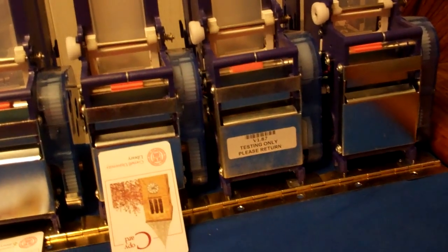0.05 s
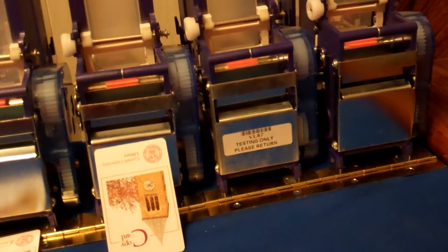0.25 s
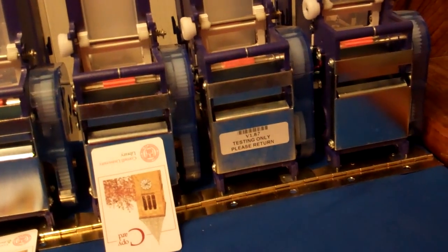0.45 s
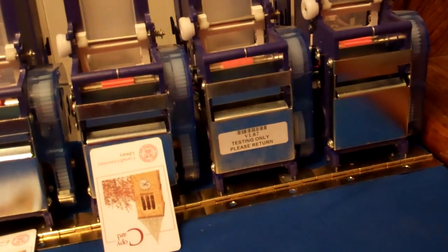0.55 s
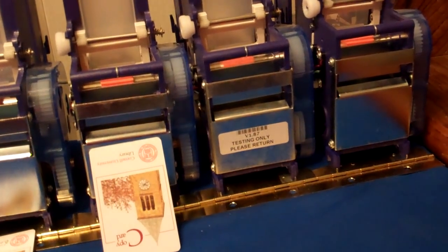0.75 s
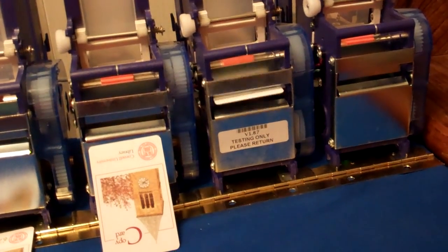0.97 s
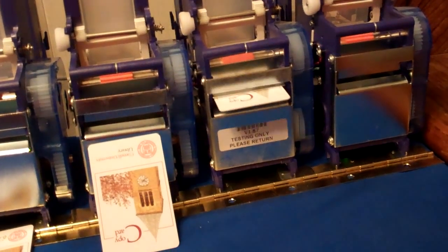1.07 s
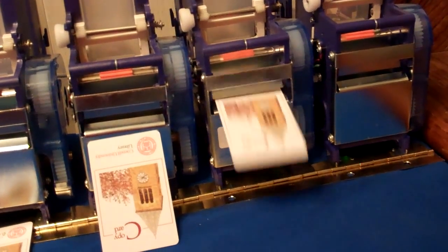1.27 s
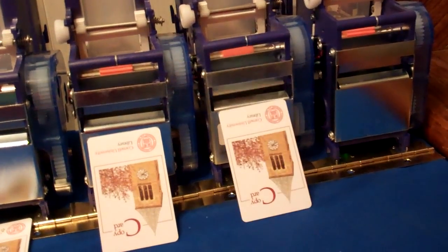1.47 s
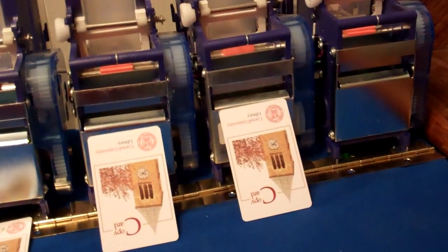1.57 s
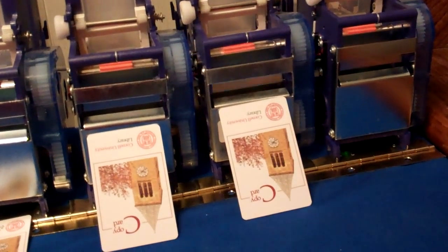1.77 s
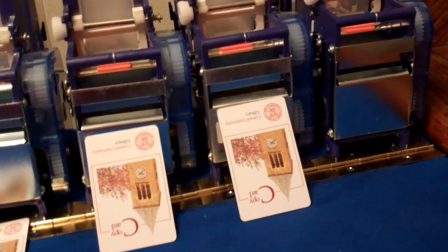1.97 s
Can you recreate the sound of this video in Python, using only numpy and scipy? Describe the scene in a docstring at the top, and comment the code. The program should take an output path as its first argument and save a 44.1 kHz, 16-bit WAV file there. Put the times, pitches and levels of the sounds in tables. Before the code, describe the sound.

Small motorised card dispenser whirs and rattles, pushes out a card with snaps, then stops abruptly

```python
"""A plastic rattle and a thin whine: a small motorised card dispenser on a table, close by in a quiet room.
The whine is four partials locked to the motor speed; gear teeth tick and scrape, ringing in the frame.
The motor slows and sings while rollers rasp along a card, drawn as coloured noise.
The card snaps free and taps the chute in short cracks of noise; the motor speeds up, then drops away.
One faint ring follows as the gears settle, over hiss and a faint mains hum."""
import sys
import numpy as np
from scipy.fft import rfft, irfft
from scipy.io import wavfile

SR = 44100
rng = np.random.default_rng(int(sys.argv[2]) if len(sys.argv) > 2 else 0)


def put_to_file(sound):
    """Save the sound as 16-bit audio at rate SR, in the file named by the first command-line argument."""
    columns = np.atleast_2d(sound).T  # one column per channel
    safe = np.clip(columns, -1, 1)
    whole_steps = np.round(safe * 32767)
    wavfile.write(sys.argv[1], SR, whole_steps.astype(np.int16))


N = 88993
TIME = np.arange(N) / SR  # s
FREQS = np.fft.rfftfreq(2 * N, 1 / SR)  # Hz, for a doubled length so that filter tails do not wrap round


def from_db(db):
    """Amplitude factor for a level in dB."""
    return 10 ** (np.asarray(db) / 20)


def rms_one(x):
    """The same shape scaled to an RMS of 1."""
    return x / np.sqrt(np.mean(x ** 2) + 1e-20)


def in_time(rows):
    """Each column of a time curve, interpolated at every sample."""
    seconds, *columns = np.transpose(rows)
    return [np.interp(TIME, seconds, column) for column in columns]


def colour(points):
    """Gain at every frequency from (frequency [Hz], level [dB]) points, joined along log frequency."""
    hz, db = np.transpose(points)
    return from_db(np.interp(np.log(FREQS + 1), np.log(hz), db))


def filtered(x, gain):
    """Sound shaped by a frequency response."""
    return irfft(rfft(x, 2 * N) * gain)[..., :N]


def drift(hz):
    """Random wavering slower than about hz, with an RMS of 1."""
    return rms_one(filtered(rng.standard_normal(N), 1 / (1 + (FREQS / hz) ** 4)))


def reflections(decay_s):
    """Frequency response of a dying cloud of random reflections, of unit energy."""
    cloud = rng.standard_normal(N) * np.exp(-np.minimum(TIME / decay_s, 50))
    return rfft(cloud / np.linalg.norm(cloud), 2 * N)


def spread(middle, other):
    """Stereo: the side is partly the middle with scattered phase, partly another sound of its kind."""
    # side against middle: (frequency [Hz], level [dB])
    side_width = [(100, -7), (400, -37.5), (750, -53), (1400, -21.5), (2700, -11.5), (5500, -4.5),
                  (10000, -1), (13500, 2.5)]
    scatter_s, likeness = 0.0061, 0.55  # decay of the scatter (s), share of the side drawn from the middle
    scatter = 1j * rms_one(np.imag(reflections(scatter_s)))
    scattered = filtered(middle, scatter)
    mixed = likeness * scattered + np.sqrt(1 - likeness ** 2) * other
    side = filtered(mixed, colour(side_width))
    return np.array([middle + side, middle - side])


def background():
    """The quiet room: coloured hiss in stereo, and the hum as steady sines alike on both sides."""
    # colour of the room noise: (frequency [Hz], relative level [dB])
    hiss_colour = [(25, -25), (55, -26), (95, -12), (240, -11.5), (400, -15.5), (750, -6), (1400, -14.5),
                   (2600, -14), (4500, -14.5), (7300, -14), (8000, -9), (8800, -13.5), (14000, -13.5)]
    # steady tones of the hum: (frequency [Hz], RMS level [dB])
    hum_tones = [(120, -72.5), (221, -82)]
    hiss_db = -57.5  # RMS before the stereo spread
    noise = filtered(rng.standard_normal((2, N)), colour(hiss_colour))
    hiss = from_db(hiss_db) * rms_one(noise)
    hum = sum(from_db(db) * rms_one(np.sin(2 * np.pi * hz * TIME)) for hz, db in hum_tones)
    return spread(*hiss) + hum


def room(x):
    """Short reverberation: decaying random reflections, drawn separately for each side."""
    t60_s, level_db = 0.27, -11
    decay_s = t60_s / np.log(1000)
    sides = [filtered(x, reflections(decay_s)) for _ in range(2)]
    return from_db(level_db) * np.array(sides)


def settle():
    """One faint ring as the gears come to rest: a decaying sine."""
    start_s, ring_hz, level_db, decay_s = 1.894, 2720, -54, .009
    age = np.maximum(TIME - start_s, 0)
    return from_db(level_db) * np.exp(-age / decay_s) * np.sin(2 * np.pi * ring_hz * age)


def card():
    """The card's edge catches, snaps free and taps the chute: short, dead cracks of decaying noise."""
    # snaps and taps: (time [s], starting level [dB], decay [s], brightness [dB per octave])
    snaps = [(0.616, -19, 0.0015, -2), (0.7088, -27, 0.0044, -2), (0.8465, -18, 0.0067, 2),
             (0.8505, -18.5, 0.0033, -3), (.924, -20, 0.0089, 1), (1.3169, -22.5, 0.0065, 6),
             (1.336, -25.5, 0.0095, -1), (1.3589, -20.5, 0.0065, 1.5), (1.3605, -7.5, 0.0022, -0.5),
             (1.4091, -22.5, 0.0045, 1), (1.4712, -21.5, 0.0078, 0)]
    # colour common to all snaps: (frequency [Hz], relative level [dB])
    snap_colour = [(60, -31), (300, -20), (700, -6), (1400, -6.5), (2400, 4.5), (3100, 7.5), (3520, 10),
                   (4000, 8), (5200, 4.5), (8000, -0.5), (14000, 4)]
    body = colour(snap_colour)
    octaves = np.log2(np.clip(FREQS, 500, 14000) / 1000)  # from 1 kHz
    out = 0
    for start_s, db, decay_s, brightness in snaps:
        envelope = (TIME >= start_s) * np.exp(-np.abs(TIME - start_s) / decay_s)
        crack = envelope * rng.choice([-1, 1], N)
        tone = rms_one(body * from_db(brightness * octaves))
        out = out + from_db(db) * filtered(crack, tone)
    return out


def roller_rasp(drag):
    """The rollers rasp along the card: coloured rubbing noise, loud while they drag it."""
    # loudness of the rasp: (time [s], level [dB])
    rasp_level = [(.6, -100), (.68, -51), (.72, -30), (.8, -30.5), (.87, -38.5), (1, -31.5), (1.1, -30.5),
                  (1.28, -30), (1.32, -53), (1.4, -100)]
    # its colour: (frequency [Hz], relative level [dB])
    rasp_colour = [(150, -70), (560, -34), (780, -7.5), (1000, -10.5), (1300, -7), (1700, -11.5),
                   (3200, -9), (3700, -1.5), (4200, 3.5), (4750, -3.5), (5100, 0), (5700, -9),
                   (9000, -15.5)]
    level_db, = in_time(rasp_level)
    return from_db(level_db) * rms_one(filtered(drag, colour(rasp_colour)))


def frame_response():
    """The frame's broad colour, its main resonances and a thicket of weak ones."""
    # broad colour: (frequency [Hz], relative level [dB])
    frame_colour = [(100, -69), (300, -33), (430, -28), (520, -23), (750, -15.5), (1250, -14), (1680, -11),
                    (1950, -1.5), (2500, 5), (3200, -4), (3800, 1.5), (4800, -9.5), (6000, -12),
                    (10000, -10.5), (14000, -11)]
    # main resonances: (frequency [Hz], width [Hz], lift [dB])
    resonances = [(535, 53, 10), (708, 53, 5.5), (770.6, 26, 9.5), (1078, 26, 10.5), (1463, 47, 9),
                  (2038, 200, 6), (2293, 45, 5), (2386, 62, 1), (2700, 39, 2.5), (2897, 106, 4.5),
                  (2953, 86, 8), (3220, 29, 10), (3436, 60, 7), (3518, 107, 7), (6510, 38, 10),
                  (6950, 340, 3.5), (8090, 290, 3.5), (8630, 71, 4.5), (9370, 74, 5), (10810, 240, 4.5),
                  (11410, 570, 4.5)]
    fine_share, fine_decay_s = .4, 0.0086
    lift_db = sum(db / (1 + (2 * (FREQS - hz) / width) ** 2) for hz, width, db in resonances)
    # the weak modes count for more towards the treble
    fine_modes = fine_share * FREQS / (FREQS + 2000) * reflections(fine_decay_s)
    return colour(frame_colour) * from_db(lift_db) * (1 + fine_modes)


def gear_rattle(force):
    """Tooth forces ring in the plastic frame, with bass, middle and treble each at its own level."""
    # loudness by band: (time [s], middle level [dB], treble level [dB], bass level [dB])
    gear_level = [(0, -30.5, -27, -44), (.12, -31, -27.5, -46.5), (.24, -26, -27.5, -44),
                  (.37, -27, -27.5, -45), (.46, -29, -29.5, -45.5), (.55, -29, -27.5, -41),
                  (.69, -30, -28, -43.5), (.76, -29.5, -29, -51.5), (.83, -32, -27.5, -38.5),
                  (.875, -35, -33.5, -46), (.97, -32, -31, -47), (1.1, -29, -29, -44),
                  (1.29, -32.5, -29.5, -49.5), (1.31, -34.5, -34, -45), (1.39, -35.5, -33.5, -45),
                  (1.47, -37, -31.5, -46), (1.52, -37, -32.5, -47), (1.62, -30, -26.5, -42),
                  (1.77, -31.5, -29, -44.5), (1.794, -29, -36, -44), (1.825, -46, -52, -52.5),
                  (1.87, -64, -72, -69), (1.95, -75, -96, -74)]
    bass_top_hz, middle_top_hz = 1690, 4700
    frame = frame_response()
    bass, below_treble = (1 / (1 + (FREQS / hz) ** 20) for hz in (bass_top_hz, middle_top_hz))
    bands = below_treble - bass, 1 - below_treble, bass
    rattle = 0
    for level_db, band in zip(in_time(gear_level), bands):
        rattle = rattle + from_db(level_db) * rms_one(filtered(force, frame * band))
    return rattle


def gears(cycles, whine_hz):
    """Every tooth lands with a tick and a short scrape; the same contacts pulse the rollers' rasp."""
    whine_per_tooth = 2.8  # whine cycles from one tooth to the next
    tooth_decay_s, tooth_spread_db = 0.00074, 1.5
    rub_share, tick_share = 0.95, 3.25  # steady rubbing and hard tick, against the scrape
    flutter_hz, flutter_width_hz, flutter_db = 40.71, 46, 0.98  # centre, bandwidth, RMS swing
    teeth = cycles / whine_per_tooth
    tooth = teeth.astype(int)
    age = teeth % 1 * whine_per_tooth / whine_hz  # s since the tooth landed
    strength = from_db(tooth_spread_db * rng.standard_normal(N))[tooth]
    contact = rub_share + strength * np.exp(-age / tooth_decay_s)
    scrape, drag = contact * rng.standard_normal((2, N))
    tick = tick_share * strength * np.diff(tooth, prepend=0)  # one sample at each new tooth
    swing = rms_one(drift(flutter_width_hz) * np.cos(2 * np.pi * flutter_hz * TIME))
    flutter = from_db(flutter_db * swing)
    return gear_rattle((scrape + tick) * flutter) + roller_rasp(drag * flutter)


def whine(cycles):
    """Four partials locked to the motor, each roughened by its own random wavering."""
    # loudness of the partials: (time [s], 1st level [dB], 2nd level [dB], 3rd level [dB], 4th level [dB])
    partial_levels = [(0, -54.5, -64, -49, -71), (.68, -54, -40, -50, -45), (.75, -44, -31.5, -29, -30.5),
                      (.83, -50, -35, -29, -38), (.88, -51.5, -44.5, -32.5, -50),
                      (.98, -41.5, -38.5, -30, -40), (1.06, -45.5, -34, -32.5, -45),
                      (1.2, -45.5, -36.5, -34, -37), (1.24, -51.5, -34.5, -48, -51),
                      (1.29, -37, -27, -28.5, -43), (1.315, -66, -49, -51, -51), (1.43, -45, -52, -45, -53),
                      (1.53, -53, -56, -49, -51), (1.63, -41.5, -73, -40.5, -51),
                      (1.78, -51, -34, -46, -40.5), (1.87, -82, -77, -75, -94)]
    # wavering of each partial, 1st to 4th: (RMS share of the steady tone [0-1])
    roughness = [0.15, 0.41, 0.26, .5]
    rough_hz = 118  # fastest wavering
    out = 0
    for k, (level_db, rough) in enumerate(zip(in_time(partial_levels), roughness), 1):
        waver = 1 + rough * (drift(rough_hz) + 1j * drift(rough_hz))
        turning = np.exp(2j * np.pi * (k * cycles + rng.random()))
        out = out + from_db(level_db) * rms_one(np.real(waver * turning))
    return out


def scene():
    """One motor speed drives whine and gears; two random takes of the sources feed front and flank."""
    # motor speed as the pitch of its whine: (time [s], frequency [Hz])
    motor_speed = [(0, 1012), (.2, 1002), (.45, 1017), (.69, 1006), (.745, 994), (.785, 929), (.815, 900.4),
                   (.87, 911.5), (.95, 907.5), (1.05, 892.7), (1.11, 898.2), (1.17, 907.3), (1.23, 945),
                   (1.29, 953.3), (1.34, 1020), (1.42, 1055), (1.56, 1075), (1.76, 1081), (1.81, 1020),
                   (1.88, 594)]
    jitter, jitter_hz = .003, 30  # RMS share of the pitch, fastest wavering
    steady_hz, = in_time(motor_speed)
    whine_hz = steady_hz * (1 + jitter * drift(jitter_hz))
    cycles = np.cumsum(whine_hz) / SR
    front, flank = (whine(cycles) + gears(cycles, whine_hz) + card() for _ in range(2))
    return spread(front, flank) + room(front) + settle() + background()


def record(dry):
    """The microphone signal loses its top in a very steep low-pass."""
    cutoff_hz = 14180
    return filtered(dry, 1 / np.sqrt(1 + (FREQS / cutoff_hz) ** 900))


dry = scene()
out = record(dry)
put_to_file(out)
```